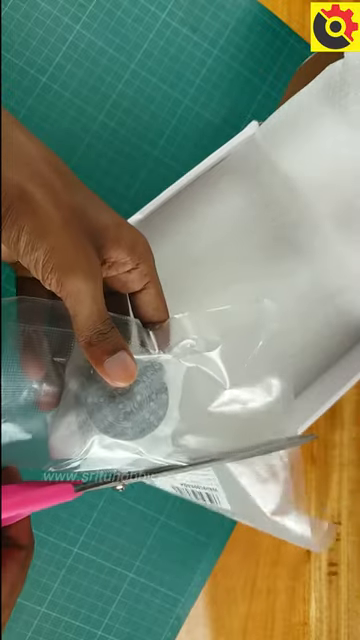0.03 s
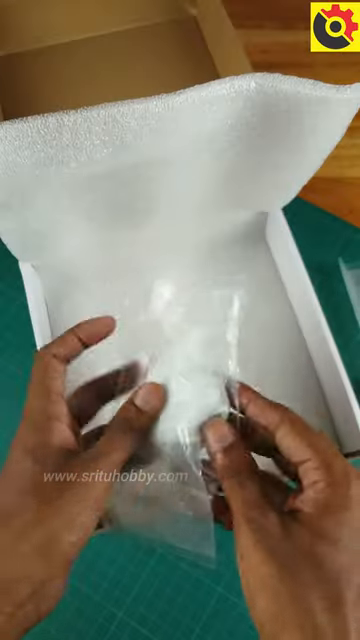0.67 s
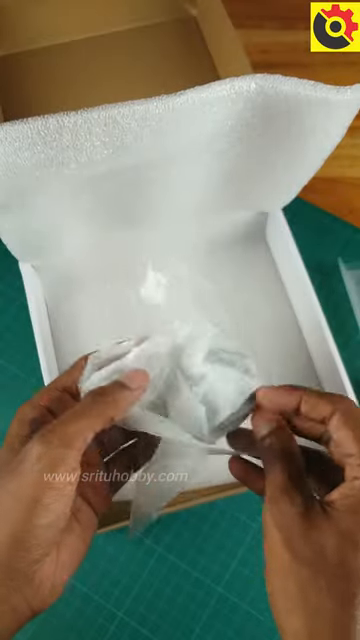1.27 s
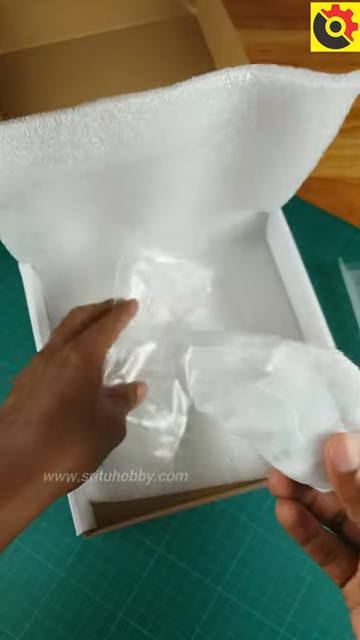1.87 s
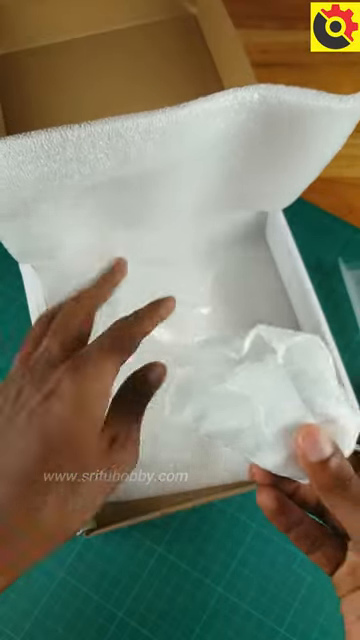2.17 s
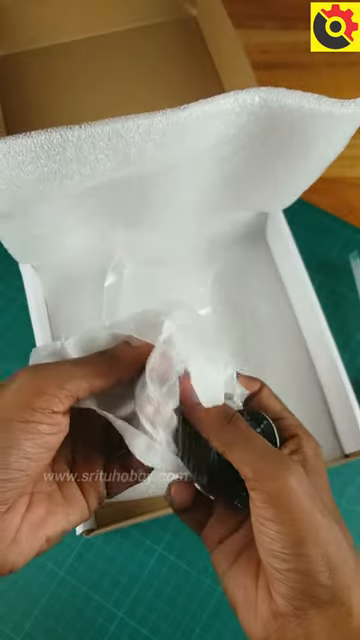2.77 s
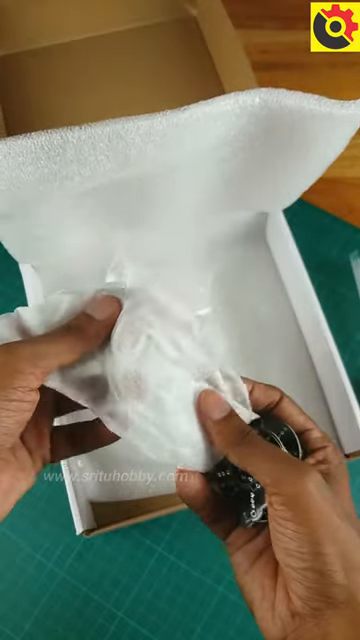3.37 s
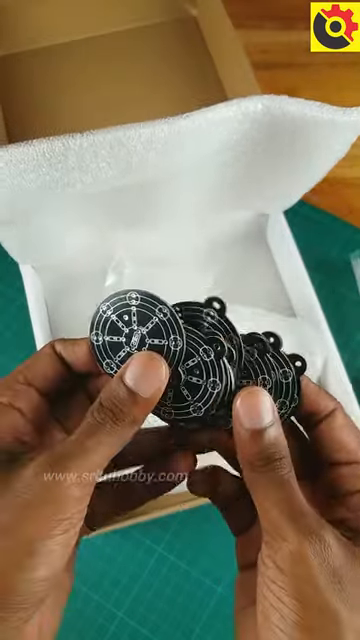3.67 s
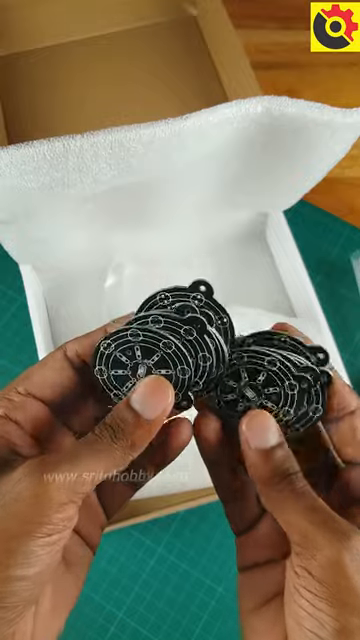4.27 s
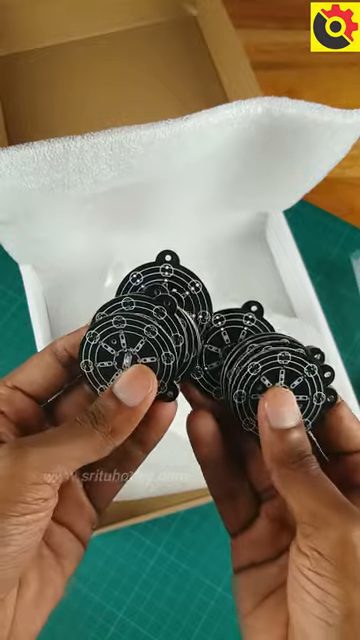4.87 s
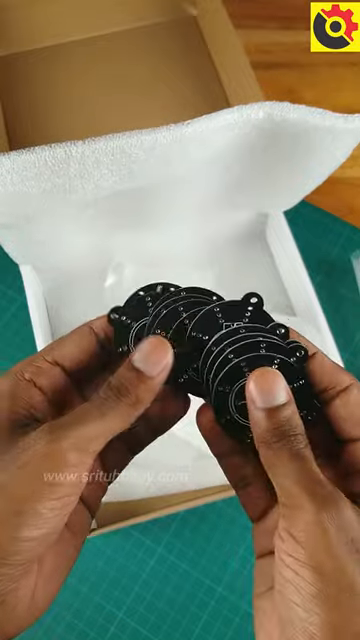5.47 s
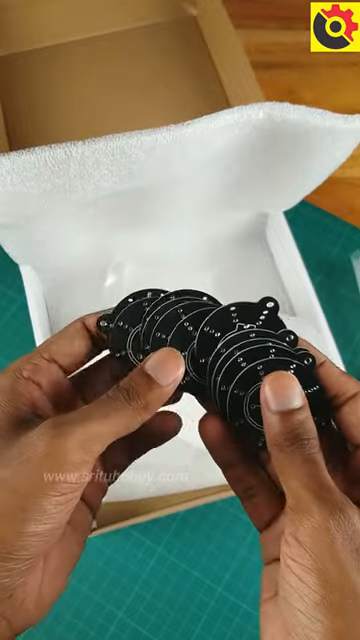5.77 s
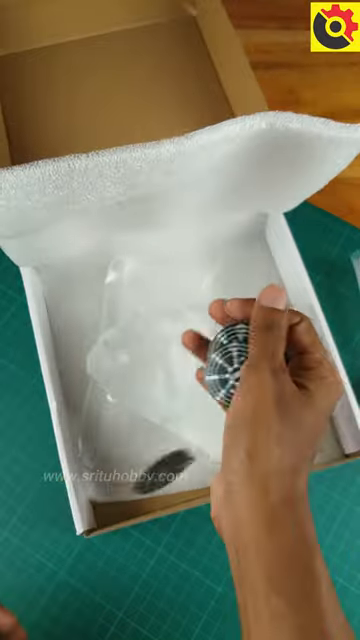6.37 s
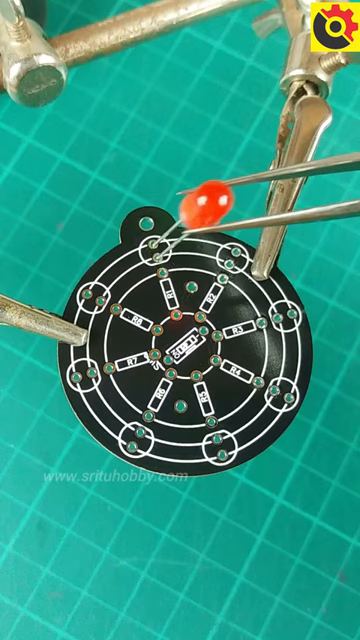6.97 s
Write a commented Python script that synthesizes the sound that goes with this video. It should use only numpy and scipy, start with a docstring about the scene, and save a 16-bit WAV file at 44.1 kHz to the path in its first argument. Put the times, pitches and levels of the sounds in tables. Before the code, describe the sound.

Scissors snip a plastic bag, the wrapping crinkles, then thin circuit boards click together and clatter into a cardboard box.

```python
"""Unpacking circuit boards

Scissors crack through a plastic bag; its creases pop and crinkle, and foam wrap hisses as thin circuit
boards slide out. The boards tick and ring as they are fanned out, then drop into a cardboard box on a
table: hollow knocks under a bright clatter. Close up, in a small quiet room."""
import sys
import numpy as np
from scipy import signal
from scipy.io import wavfile
from scipy.ndimage import map_coordinates

SR = 44100
rng = np.random.default_rng(int(sys.argv[2]) if len(sys.argv) > 2 else 0)


def bounce(signal):
    """Save signal as a 16-bit WAV file at the path given by the first command-line argument."""
    frames = np.transpose(np.atleast_2d(signal))
    limited = np.clip(frames, -1, 1)
    pcm = np.round(limited * 32767).astype(np.int16)
    wavfile.write(sys.argv[1], SR, pcm)


N = 309582
TIME = np.arange(N) / SR
HIT_TIME = TIME[:8192]

# Boards landing in the box. Each row: start in seconds, level in dB, hardness as a cut-off in Hz.
LANDINGS = [(6.4984, -34.5, 2100), (6.591, -20.5, 2880), (6.642, -39, 1600), (6.7311, -27.5, 1000),
            (6.761, -29.5, 1305), (6.782, -24.5, 1700), (6.807, -18, 1900), (6.8215, -22.5, 2220),
            (6.9095, -43.5, 1700), (6.9475, -38, 1750), (6.9746, -44, 1406)]
# The loaded box's hollow ring. Each row: pitch in Hz, relative level in dB, t60 in seconds.
BOX_MODES = [(143.3, -20, 0.17), (565, -7.5, 0.14), (614, -7, 0.083), (704, 2, 0.049), (1119, -3, 0.065),
             (1314, -6.5, 0.058), (1482, 1, 0.038), (1980, -2, 0.053), (2266, -8, 0.028)]
# A board's beating main ring and its edge ring. Each row: pitch in Hz, relative dB, t60 in seconds.
BOARD_MODES = [(5690, 0, .045), (5520, -5, .035), (5880, -10, .022)]
EDGE_MODES = [(3430, -6, .04), (7600, -15, .03), (10170, -10, .03), (11620, 0, .038), (13300, -1, .025),
              (13920, -1, .035)]
# Board against board. Each row: start in seconds, main ring in dB, edge tick in dB.
BOARD_CLICKS = [(2.8932, -54, -44), (2.9005, -56, -37.5), (3.2607, -45.5, -60), (3.299, -52, -52),
                (3.3048, -47.5, -41.5), (3.356, -69, -56), (4.499, -52.5, -63), (5.609, -67, -65.5),
                (5.627, -63, -65), (6.509, -56, -49), (6.6441, -53, -45.5), (6.653, -47, -40.5),
                (6.681, -44, -54), (6.7351, -46, -48), (6.7457, -33, -41), (6.761, -34, -24.5),
                (6.7681, -38, -25), (6.8419, -47, -41)]
# Light touches of held boards. Each row: start in seconds, level in dB, tone centre in Hz.
BOARD_TAPS = [(4.4265, -67, 3900), (4.7344, -67.5, 3750), (4.867, -69.5, 3900), (4.9952, -59, 1890),
              (6.1178, -66.5, 2600)]
# The bag's loudest creases. Each row: start in seconds, level in dB, tone centre in Hz.
CREASE_POPS = [(0.193, -45.5, 2120), (0.2241, -46, 600), (0.356, -47, 2100), (0.434, -51, 1420),
               (0.6998, -50.5, 930), (0.7066, -42.5, 1610), (0.772, -41, 2380), (0.8063, -53, 2200),
               (0.8572, -57.5, 12500), (0.8583, -47, 1440), (0.8909, -49, 1410), (0.964, -40.5, 2700),
               (0.9879, -50, 1490), (1.227, -46, 1700), (1.2647, -37.5, 1355), (1.324, -53, 1000),
               (1.4071, -45, 1190), (1.442, -44, 2880), (1.4688, -43.5, 1210), (1.6, -46.5, 1006),
               (1.7437, -40.5, 1800), (1.792, -52, 1510), (1.857, -53.5, 11700), (1.8895, -49.5, 2300),
               (1.8989, -41, 1700), (1.9704, -52.5, 890), (2.0683, -46.5, 1680), (2.076, -46.5, 1520),
               (2.263, -55.5, 840)]
# Hand moves on film and foam; the last row is a brief brush leading into the box's first knock. Each row: #
# start and end in seconds, crinkle and hiss in relative dB, swell over the move in dB.
HAND_STROKES = [(0.085, 0.112, -60, -70, -1.5), (0.143, 0.161, -51.5, -65, 0),
                (0.217, 0.234, -41.5, -60, -1), (0.275, 0.344, -75, -60, -1.5),
                (0.358, 0.591, -60, -74, -15.5), (0.696, 1.088, -61, -75.5, 0.5),
                (1.173, 1.453, -58.5, -77.5, -9), (1.587, 1.749, -54.5, -66, 9.5),
                (1.775, 1.811, -49, -67.5, -2.5), (1.867, 2.081, -56.5, -74.5, 6.5),
                (2.116, 2.157, -50, -71, 3), (2.372, 2.456, -62.5, -71, -2.5), (2.426, 2.94, -68, -77, -5),
                (2.981, 3.155, -62, -66, -3), (6.487, 6.498, -49.5, -68.5, 10.5)]
# The EQ curve of each texture. Each row: frequency in Hz, relative level in dB.
CARDBOARD_EQ = [(50, -13), (110, -1.5), (450, -2.5), (680, 1), (1600, -0.5), (4400, -3.5), (6000, -23.5),
                (11000, -10)]
TICK_EQ = [(350, -12.5), (1200, -6), (3800, -2), (6000, -4.5), (8000, -15), (10500, -0.5), (14000, 7.5),
           (16000, -9)]
POP_EQ = [(50, -17), (130, 12), (700, 5.5), (4500, -2), (6000, -16), (8000, -25), (11000, -18),
          (16000, -21)]
CRINKLE_EQ = [(45, -45), (120, 6), (480, 5.5), (700, 9.5), (1000, 5), (2500, 3.5), (4300, -6),
              (6000, -11.5), (8000, -64)]
FOAM_EQ = [(300, -39), (1000, 10.5), (4200, 7), (8000, -10.5), (11000, 0), (16000, -6)]
BLADE_EQ = [(100, -2), (900, -16.5), (2900, -0.5), (5500, -10), (8000, -25), (10500, -14), (16000, -31)]
AIR_EQ = [(35, -47), (60, -4.5), (185, 0), (550, -11), (968, -12.5), (3040, -21), (4900, -26.5),
          (6430, -33), (16000, -27)]
# The room's tail. Each row: frequency in Hz, t60 in seconds.
ROOM_DECAY = [(100, 1), (600, 0.23), (2000, 0.39), (5600, 0.3), (14000, 0.14)]

# The stack slips off the fingers faster and faster, pours for a moment, then settles.
SLIP_S, POUR_S, SETTLE_S = 6.642, 6.765, 6.812
GATHER_DB_PER_S, SETTLE_DB_PER_S = 324, 347
# The empty box rings higher and shorter; from LOADED_S on, the pile muffles its lows.
LOADED_S, EMPTY_PITCH_RATIO, EMPTY_DECAY_RATIO, PILE_LOW_DB = 6.7, 1.15, 0.51, -8.5


def box_landings():
    """The heavy hits: each board knocks on the box, whose floor swells into a low thud."""
    out = np.zeros(N)
    age = HIT_TIME / 0.013
    thud = age * np.exp(1 - age) * np.sin(2 * np.pi * 108 * HIT_TIME)
    for s, db, hard_hz in LANDINGS:
        knock = box_knock(hard_hz, load=float(s > LOADED_S), detune=0.0065)
        add(out, s, amp(db) * (knock + amp(-21.5) * thud))
    return out


def box_knock(hard_hz, load, detune, count=6, gap_s=0.0013):
    """A board touches down edge after edge; the contacts build up the cardboard's hollow ring."""
    soft = lambda hz: 1 / np.hypot(1, (hz / hard_hz) ** 2)
    muffled = lambda hz: soft(hz) * amp(PILE_LOW_DB * load / (1 + (hz / 520) ** 10))
    contacts = burst(decay_s=0.01, flutter=1)
    for k in range(1, count):
        s = (k + rng.uniform(-.5, .5)) * gap_s
        add(contacts, s, rng.choice([-1, 1], 1) * rng.uniform(0.33, 1))
    slap = unit_hit(colour(contacts, CARDBOARD_EQ, muffled))
    pitch, sustain = EMPTY_PITCH_RATIO ** (1 - load), EMPTY_DECAY_RATIO ** (1 - load)
    modes = [(hz * pitch, db + 20 * np.log10(soft(hz)), t60 * sustain) for hz, db, t60 in BOX_MODES]
    attack = 1 - np.exp(-HIT_TIME / (2 * gap_s))
    return unit_hit(slap + amp(-0.5) * unit_hit(attack * ring(modes, detune)))


def board_clatter(count=14):
    """Falling boards collide many times, each with its own ring, and rattle on the box."""
    first = round(SLIP_S * SR)
    t = TIME[first:]
    flow_db = -GATHER_DB_PER_S * np.maximum(POUR_S - t, 0)
    flow_db -= SETTLE_DB_PER_S * np.maximum(t - SETTLE_S, 0)
    hit_gain = amp(-28.5 + flow_db)
    jingle_gain = amp(-33.5 + 0.9 * flow_db)  # free boards ring even when few collide
    choke = np.exp(-HIT_TIME / 0.059)  # the next board to land stops the ring
    out = np.zeros(N)
    for _ in range(count):
        jingle = choke * (ring(BOARD_MODES, detune=.008) + amp(-3) * ring(EDGE_MODES, detune=.012))
        hit = choke * (edge_tick(30000) + amp(-6) * box_knock(3000, load=1, detune=0.0063))
        collisions = grains(per_s=60, spread_db=3.5)[first:]
        for gain, sound in (hit_gain, hit), (jingle_gain, jingle):
            add(out, SLIP_S, signal.fftconvolve(gain * collisions, sound / np.linalg.norm(sound)))
    return out / np.sqrt(count)


def board_clicks(slide_samples=400):
    """An edge slides briefly, then clicks onto the next board; the gentler the touch, the duller."""
    out = np.zeros(N)
    held = np.exp(-HIT_TIME / 0.017)  # fingers and neighbours damp the ring
    for s, ring_db, tick_db in BOARD_CLICKS:
        chatter = burst(decay_s=0.005, flutter=0.88)  # the boards buzz together as they meet
        body = signal.fftconvolve(held * ring(BOARD_MODES, detune=.004), chatter)[:len(HIT_TIME)]
        tick = amp(tick_db) * edge_tick(hard_hz=16000 * amp(0.54 * (tick_db + 34)))
        slide = rng.standard_normal(slide_samples) * np.linspace(0, 1, slide_samples)
        lead_in = signal.fftconvolve(slide / np.linalg.norm(slide), tick)
        add(out, s - slide_samples / SR, amp(-9.5) * lead_in)
        add(out, s, amp(ring_db) * unit_hit(body) + tick)
    return out


def edge_tick(hard_hz):
    """A hard edge strikes: a dry crack with the board's edge ring on top."""
    soft = lambda hz: 1 / np.hypot(1, hz / hard_hz)
    crack = unit_hit(colour(burst(decay_s=0.011, flutter=1.14), TICK_EQ, soft))
    modes = [(hz, db + 20 * np.log10(soft(hz)), t60) for hz, db, t60 in EDGE_MODES]
    return unit_hit(crack + amp(-1.8) * ring(modes, detune=0.0076))


def bag_pops():
    """Creases buckle: each gives a sharp, damped pop while the sheet flutters and its panel rings."""
    out = np.zeros(N)
    for s, db, centre_hz in CREASE_POPS:
        tone = lambda hz: band(hz, centre_hz, q=1.3) + amp(-20)
        pop = unit_hit(colour(burst(decay_s=0.0053, flutter=1.42), POP_EQ, tone))
        panel = ring([(.82 * centre_hz, 0, .03)], detune=0.042)
        add(out, s, amp(db) * unit_hit(pop + amp(-10) * panel))
    return out


def scissors():
    """The blades crack through the bag, scrape unevenly along each other and end on a low bump."""
    slips = grains(per_s=900, spread_db=3) * amp(2 * drift(90))
    closing = np.interp(TIME, [.318, .352], [1, .89])  # pitch sinks as the cut nears the tips
    pitch = closing * np.exp(.012 * drift(120))
    scrape = sum(amp(db) * resonate(resonate(slips, hz * pitch, width), hz * pitch, width)
                 for hz, width, db in [(1325, 73, -51.5), (1800, 500, -57), (2760, 150, -59)])
    out = scrape * gesture(0.225, 0.355, rise=.004, fall=0.043)
    handle_hum = resonate(slips, 554, 28)
    out += amp(-57) * handle_hum * gesture(0.218, 0.35, rise=0.0034, fall=0.057)
    crack = unit_hit(colour(burst(decay_s=0.007, flutter=2.5), BLADE_EQ))
    add(out, .2514, amp(-34) * crack)
    for s, db, t60 in [(.243, -52, 0.13), (.357, -48.5, 0.27)]:  # low bumps
        add(out, s, amp(db) * ring([(145, 0, t60)], detune=0))
    return out


def hand_rubbing():
    """Each stroke sets off clumps of crinkles in the film and a fine hiss of sliding foam."""
    crinkle_gain, hiss_gain, wake = np.zeros((3, N))
    for start, end, crinkle_db, hiss_db, swell_db in HAND_STROKES:
        effort = amp(swell_db * np.interp(TIME, [start, end], [-.5, .5]))
        bend = effort * gesture(start, end, rise=0.0033, fall=0.024)
        slide = effort * gesture(start, end, rise=0.011, fall=0.035)
        crinkle_gain = np.maximum(crinkle_gain, amp(crinkle_db) * bend)
        hiss_gain = np.maximum(hiss_gain, amp(hiss_db) * slide)
    for s, db, _ in CREASE_POPS:  # the film crinkles on after each pop
        add(wake, s, amp(db - 17) * np.exp(-HIT_TIME / 0.0082))
    crinkle_gain = np.hypot(crinkle_gain, wake)
    grip = unit(amp(4.2 * drift(55)))  # the film sticks and slips
    per_s = 150 + 800 * (hiss_gain / amp(-68.5)) ** 2  # fast sliding merges the crackles
    finger_bumps = resonate(resonate(rng.standard_normal(N), 119, 90), 119, 90)
    foam = unit(colour(grains(per_s=9000, spread_db=4.5) * np.sqrt(grip), FOAM_EQ))
    crinkle = grip * film_crackles(per_s) + amp(-10) * finger_bumps
    return crinkle_gain * crinkle + amp(9) * hiss_gain * foam


def film_crackles(per_s, count=12, low_hz=686, high_hz=2825, decay_cycles=5.2):
    """Small creases give way all over the film: each cracks and rings a panel of its own pitch."""
    cracks, panels = np.zeros((2, N))
    for hz in np.geomspace(low_hz, high_hz, count):
        train = grains(per_s / count, spread_db=2.5)
        panel = np.sin(2 * np.pi * hz * HIT_TIME) * np.exp(-hz * HIT_TIME / decay_cycles)
        cracks += train
        panels += signal.oaconvolve(train, unit(panel))[:N]
    return unit(unit(colour(cracks, CRINKLE_EQ)) + amp(-2.5) * unit(colour(panels, CRINKLE_EQ)))


def board_taps():
    """Boards nudge each other in the hand: dry ticks, too damped to ring."""
    out = np.zeros(N)
    for s, db, centre_hz in BOARD_TAPS:
        tone = lambda hz: band(hz, centre_hz, q=0.62) ** 2
        add(out, s, amp(db) * unit_hit(colour(burst(decay_s=0.0026, flutter=1), TICK_EQ, tone)))
    return out


def room_reverb(x):
    """Scattered reflections make a short diffuse tail, the treble dying first."""
    echoes = rng.standard_normal(SR // 2) * (rng.random(SR // 2) < 4000 / SR)
    hz, t, spectrum = signal.stft(echoes, SR, nperseg=256)
    decay = amp(-60 * t / curve_at(ROOM_DECAY, hz)[:, None])
    tail = signal.istft(spectrum * decay, SR, nperseg=256)[1]
    tail *= np.clip(np.arange(len(tail)) / SR / 0.0013, 0, 1)
    return signal.fftconvolve(x, tail / np.linalg.norm(tail))[:N]


def room_tone(whine_peak_s=5.745, sag_hz_per_s=140):
    """The bed: steady air, weak mains hum and a far-off whine that swells and fades as its pitch sags."""
    air = amp(-66.5) * unit(colour(rng.standard_normal(N), AIR_EQ))
    hum = amp(-72) * np.sin(2 * np.pi * 50 * TIME)
    from_peak = TIME - whine_peak_s
    whine_hz = 745 - sag_hz_per_s * from_peak
    whine = resonate(resonate(rng.standard_normal(N), whine_hz, 50), whine_hz, 56)
    return air + hum + amp(-70) * whine * np.exp(-(from_peak / 0.23) ** 2)


def burst(decay_s, flutter):
    """An impulse followed by a dying flutter of smaller ones."""
    x = rng.standard_normal(len(HIT_TIME)) * np.exp(-HIT_TIME / decay_s)
    x *= flutter / np.linalg.norm(x)
    x[0] = 1
    return x


def ring(modes, detune):
    """Dying modes; pitch, strength and polarity vary at random from hit to hit."""
    hz, db, t60 = np.transpose(modes)[:, :, None]
    tuning, strength, polarity = rng.standard_normal((3, len(modes), 1))
    waves = np.sign(polarity) * np.sin(2 * np.pi * hz * (1 + detune * tuning) * HIT_TIME)
    return unit_hit((amp(db + 2 * strength - 60 * HIT_TIME / t60) * waves).sum(0))


def grains(per_s, spread_db):
    """A random train of tiny, uneven clicks with the same power at any rate."""
    size = amp(spread_db * np.minimum(rng.exponential(1, N), 4)) / np.sqrt(per_s)
    return unit(size * rng.choice([-1, 1], N) * (rng.random(N) < per_s / SR))


def drift(per_s):
    """A random wobble that glides to a new value per_s times a second."""
    return unit(map_coordinates(rng.standard_normal(2048), [TIME * per_s], order=1, mode="wrap"))


def gesture(start, end, rise, fall):
    """Envelope of a hand move, timed in seconds: it catches, swells and lets go to a faint floor."""
    end = max(end, start + 2 * rise)
    times = [start - rise, start + rise, (start + end) / 2 + rise, end, end + fall]
    return np.interp(TIME, times, [0.016, 0.66, 0.85, 0.81, 0.011])


def colour(x, eq, shape=lambda hz: 1):
    """Minimum-phase EQ, times an optional gain curve."""
    hz = abs(np.fft.fftfreq(2048, 1 / SR))
    log_gain = np.log(amp(curve_at(eq, hz)) * shape(hz) + 1e-5)
    impulse = np.fft.ifft(np.exp(np.conj(signal.hilbert(log_gain)))).real
    return signal.fftconvolve(x, impulse)[:len(x)]


def resonate(x, hz, width_hz):
    """A resonance that can follow a pitch curve; rms 1."""
    carrier = np.exp(2j * np.pi * np.cumsum(hz * np.ones(len(x))) / SR)
    pole = np.exp(-np.pi * width_hz / SR)
    return unit((carrier * signal.lfilter([1 - pole], [1, -pole], x / carrier)).real)


def band(hz, centre_hz, q):
    """Gain of a broad resonance."""
    return 1 / np.hypot(1, q * (hz / centre_hz - centre_hz / (hz + 1)))


def curve_at(points, hz):
    """Reads a curve on a log-frequency axis."""
    point_hz, value = np.transpose(points)
    return np.interp(np.log(hz + 1), np.log(point_hz + 1), value)


def amp(db):
    """Decibels to gain."""
    return 10 ** (np.asarray(db) / 20)


def unit(x):
    """Scales to rms 1."""
    return x / np.sqrt(np.mean(x ** 2) + 1e-20)


def unit_hit(x):
    """Scales a hit to rms 1 over its first 7 ms."""
    return x / np.sqrt(np.mean(x[:309] ** 2) + 1e-20)


def add(mix, s, sound):
    """Mixes a sound in at s seconds."""
    part = mix[round(s * SR):][:len(sound)]
    part += sound[:len(part)]


def scene():
    """The mono mix: close handling up front, a touch of reverb, room tone underneath."""
    close = hand_rubbing() + bag_pops() + scissors()
    close += board_clicks() + board_taps() + board_clatter() + box_landings()
    return (close + amp(-12.5) * room_reverb(close) + room_tone())[None]


def record(dry):
    """A low cut at 42 Hz and a steep high cut at 16 kHz."""
    low_cut = signal.butter(4, 42, "high", fs=SR, output="sos")
    high_cut = signal.firwin(511, 16000, window=("kaiser", 9), fs=SR)
    return signal.oaconvolve(signal.sosfilt(low_cut, dry), high_cut[None], "same")


dry = scene()
out = record(dry)
bounce(out)
```